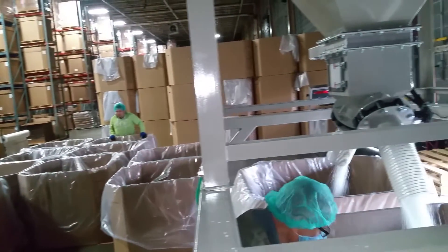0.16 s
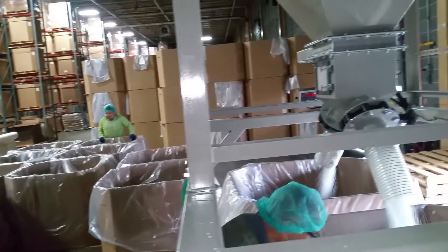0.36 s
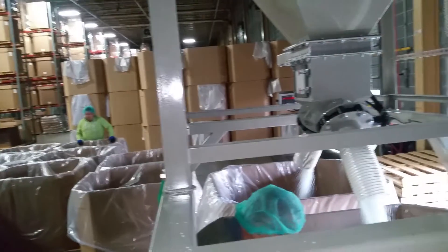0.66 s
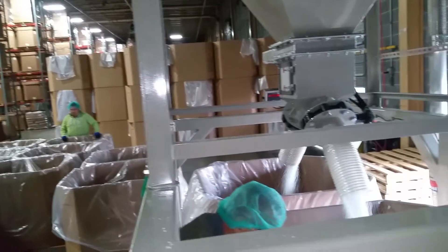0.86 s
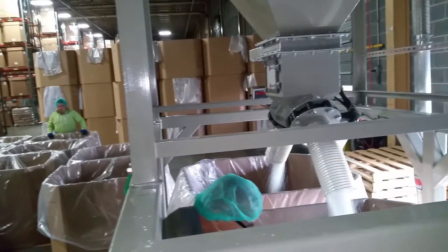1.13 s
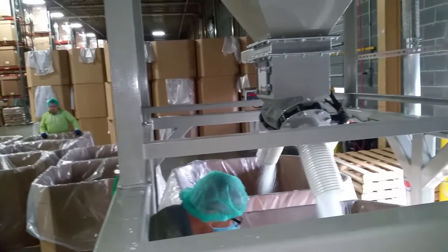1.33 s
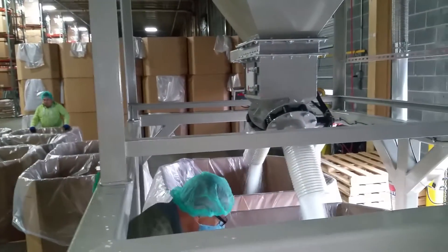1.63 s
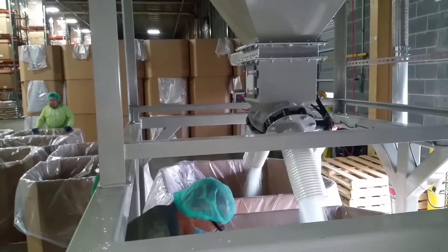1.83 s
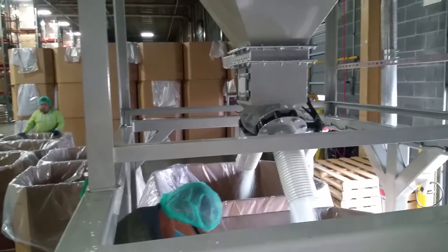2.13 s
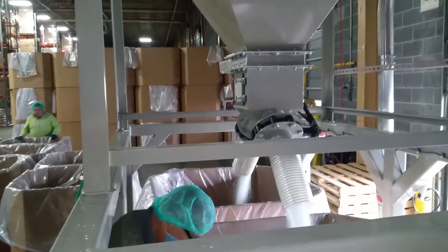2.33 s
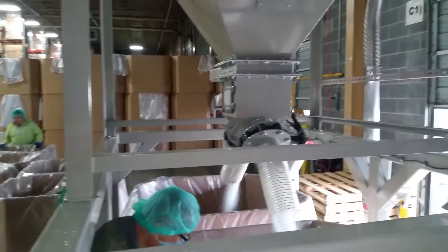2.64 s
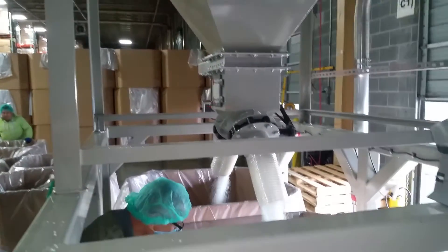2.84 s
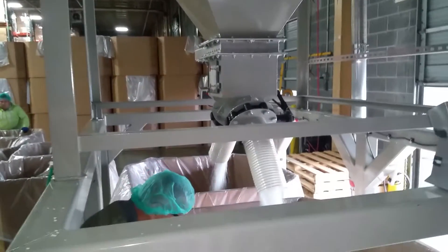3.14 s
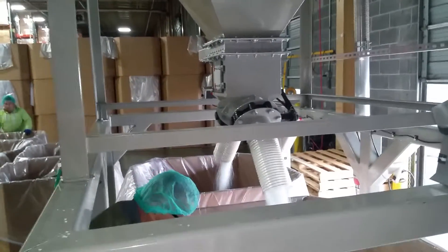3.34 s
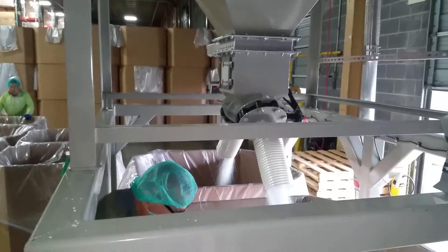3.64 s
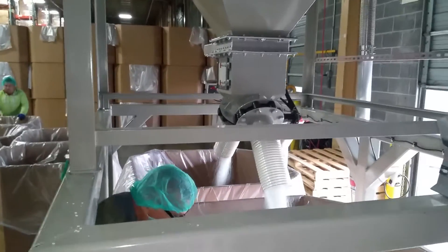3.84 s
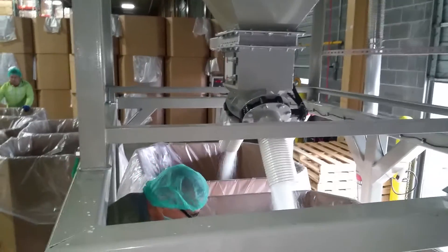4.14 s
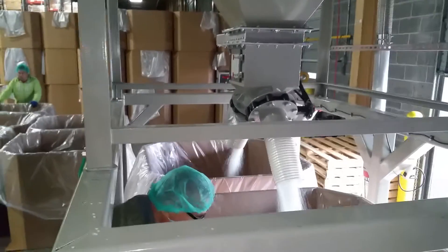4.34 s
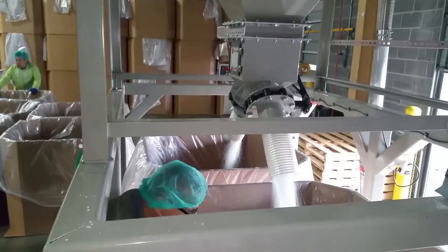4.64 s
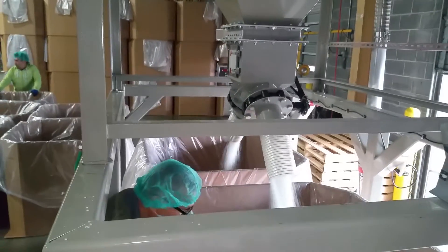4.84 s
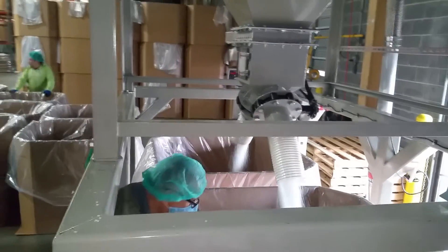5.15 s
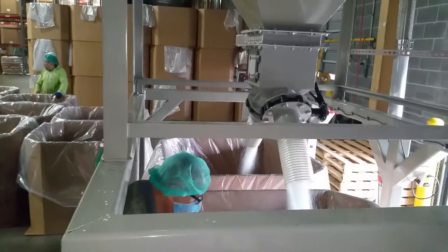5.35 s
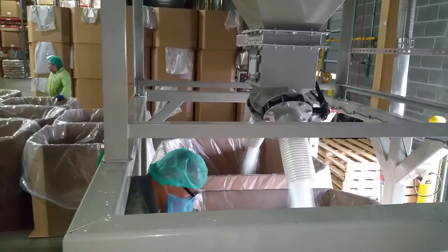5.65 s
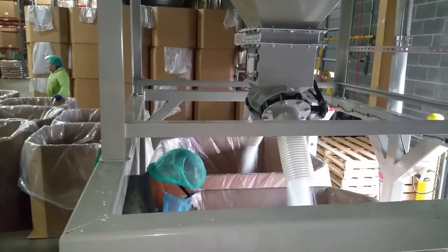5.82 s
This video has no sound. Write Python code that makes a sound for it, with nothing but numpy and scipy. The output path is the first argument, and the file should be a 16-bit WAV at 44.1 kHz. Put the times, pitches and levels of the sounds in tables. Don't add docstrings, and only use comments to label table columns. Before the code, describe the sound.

A steady industrial din already running at the start and never stopping: countless pellets striking the pipe wall, rushing air, a very high nozzle whistle, low blower hum and hopper resonance. Small surges ripple through it. The handheld stereo microphone turns slowly; the right side changes colour around one and a half seconds, and the left loses its midrange ring near 2.7 seconds, while the bright wash continues.

```python
import sys
import numpy as np
from scipy import signal
from scipy.fft import rfft, irfft, next_fast_len
from scipy.io import wavfile
from scipy.ndimage import uniform_filter1d, map_coordinates

SR = 44100
rng = np.random.default_rng(int(sys.argv[2]) if len(sys.argv) > 2 else 0)


def nominal_scale(level):
    x = np.asarray(level, float) / 20
    return 10 ** x


def file_out(sig):
    cols = np.atleast_2d(sig).T
    lim = np.clip(cols, -1, 1)
    pcm = np.round(lim * 32767).astype(np.int16)
    wavfile.write(sys.argv[1], SR, pcm)


N = 263718
TIME_S = np.arange(N) / SR
WHITE_DB = 10 * np.log10(2 / SR)
FRAME = 512


def along(points, hz):
    point_hz, value = np.transpose(points)
    return np.interp(np.log(hz + 1), np.log(point_hz + 1), value)


def over_time(points):
    s, value = np.transpose(points)
    return np.interp(TIME_S, s, value)


def wobble(rate_hz):
    knots = rng.standard_normal(int(N * rate_hz / SR) + 4)
    return map_coordinates(knots, [np.arange(N) * rate_hz / SR])


def filtered(x, response):
    size = next_fast_len(N + 8192)
    hz = np.fft.rfftfreq(size, 1 / SR)
    return irfft(rfft(x, size) * response(hz), size)[..., :N]


def pair(two, alike, lag):
    def blend(hz):
        angle = np.arccos(np.clip(alike(hz) + 0 * hz, 0, 1)) / 2
        return np.array([np.cos(angle), np.sin(angle)])

    def delay(hz):
        half_turn = np.pi * lag(hz) * hz / SR
        return np.exp(-1j * half_turn * np.array([[1], [-1]]))

    mid, side = filtered(two, blend)
    return filtered(np.array([mid + side, mid - side]), delay)


def hail(per_second, scatter_db):
    hit = rng.random((2, N)) < per_second / SR
    strength = nominal_scale(scatter_db * rng.standard_normal((2, N)))
    blows = hit * rng.standard_normal((2, N)) * strength
    return blows / blows.std()


def resonance(mode_hz, width_hz, cut_on_db):
    def response(hz):
        octaves = np.log2(hz / mode_hz + 1e-6)
        flanks = nominal_scale(np.where(octaves < 0, cut_on_db, -4) * octaves)
        damping = 1j * hz * width_hz
        return damping / (mode_hz * mode_hz - hz * hz + damping) * flanks
    return response


def ringing(modes, per_second, drift_db, flutter_db, lag, swell=lambda hz: 0, cut_on_db=4):
    out = np.zeros((2, N))
    for mode_hz, width_hz, left_db, right_db, alike in modes:
        blows = pair(hail(per_second, scatter_db=-3.5), lambda hz: alike, lambda hz: lag)
        drift = drift_db * np.array([wobble(2.46), wobble(2.47)])
        swell_db = swell(mode_hz) + drift + flutter_db * wobble(12)
        gain = nominal_scale(swell_db + [[left_db], [right_db]] - WHITE_DB)
        out += filtered(blows * gain, resonance(mode_hz, width_hz, cut_on_db))
    return out


# time_s, flow_db
FLOW_SURGES = [(0, 0.2), (.4, 0.72), (1.2, 0.5), (1.9, -0.44), (2.8, 0), (3.4, 0.63), (4.1, -0.05),
               (4.6, 0.8), (5, 0.76), (5.35, -0.95), (5.7, .6), (5.98, 0)]


def feed():
    return over_time(FLOW_SURGES)


# mean_db, drift_db_per_s, flow_share
STANDING_WAVES = [
    (-0.5, -0.16, 0.43),
    (0.74, 0.8, 0.2),
    (1.28, 0, 0.45),
]
# centre_s, half_length_s
CREST_TIMES = [
    (2.15, .5),
    (3.05, .25),
]
CREST_HEIGHTS = [2.2, 1.5]


def standing(flow_db):
    crests = [0]
    for (centre_s, half_s), crest_db in zip(CREST_TIMES, CREST_HEIGHTS):
        crests.append(crest_db * np.exp(-((TIME_S - centre_s) / half_s) ** 2))
    swells = []
    for (mean_db, drift_db, share), crest in zip(STANDING_WAVES, crests):
        swells.append(mean_db + drift_db * (TIME_S - TIME_S.mean()) + share * flow_db + crest)
    return swells


PIPE_PITCHES = [1421, 2400, 2686, 2770, 4270, 4325, 4560, 4680, 6040, 6160, 6400, 7960, 9900, 10650, 10750,
                11950]
# width_hz, left_db_per_hz, right_db_per_hz, likeness (0-1)
PIPE_MODES = [(34, -54.5, -56, 0.2), (60, -60.5, -55.5, 0), (59, -49, -49.5, 0.44), (200, -75, -56.5, 0.5),
              (73.4, -49.5, -45, 0.62), (114, -55.5, -49, 0), (25, -53, -49.5, 0.25), (70, -61.5, -65, 0.1),
              (107, -54.5, -42, 0.25), (186, -70, -46.5, 0.42), (394, -70, -55, 0.4),
              (230, -59.5, -59.5, 0.05), (450, -64.5, -65.5, 0), (60, -67, -57, 0), (60, -65, -60, 0),
              (470, -70.5, -62, 0.1)]


def pipe(flow_db):
    low_db, middle_db, high_db = standing(flow_db)

    def swell(hz):
        if hz < 3500:
            return low_db
        return middle_db if hz < 5500 else high_db

    modes = [(hz, *row) for hz, row in zip(PIPE_PITCHES, PIPE_MODES)]
    return ringing(modes, 6000, drift_db=0.5, flutter_db=0.47, lag=10.95, swell=swell, cut_on_db=92)


# pitch_hz, width_hz, left_db_per_hz, right_db_per_hz, likeness (0-1)
WHINE_MODES = [
    (15381, 50, -54, -50, .25),
    (15330, 240, -62, -58, .15),
]


def nozzle():
    return ringing(WHINE_MODES, 9000, drift_db=1.3, flutter_db=2.2, lag=10.5)


def patchy(x, patchy_db):
    spectrum = signal.stft(x, nperseg=FRAME)[2]
    field = rng.standard_normal(spectrum.shape[1:])
    field = uniform_filter1d(field, size=12, axis=0)
    field = uniform_filter1d(field, size=10, axis=1)
    gain = nominal_scale(patchy_db * field / field.std())
    return signal.istft(spectrum * gain, nperseg=FRAME)[1][:, :N]


# frequency_hz, level_db_per_hz
HISS_LEFT = [(25, -89), (55, -82), (300, -75.5), (520, -71), (1000, -65), (2000, -61.5), (3900, -66),
             (4900, -69), (5800, -62), (6900, -72), (9000, -70.5), (12000, -67), (14500, -66), (15700, -69)]
# frequency_hz, level_db_per_hz
HISS_RIGHT = [(25, -89), (55, -83), (300, -76.5), (520, -70), (1000, -63.5), (1600, -65), (3900, -59.5),
              (4900, -54), (5700, -58), (7400, -64), (8900, -65.5), (10500, -63), (14500, -61.5),
              (15700, -58.5)]
# frequency_hz, likeness (0-1)
HISS_LIKENESS = [(30, .995), (70, .95), (200, .8), (600, .76), (1000, .47), (1700, .25), (2200, .12),
                 (16000, .12)]
# frequency_hz, lag_samples
HISS_LAG = [(100, 5), (600, 8.8), (1000, 6.4), (1700, 15.2), (16000, 10.56)]


def air():
    noise = patchy(rng.standard_normal((2, N)), patchy_db=0.89)
    hiss = pair(noise, lambda hz: along(HISS_LIKENESS, hz), lambda hz: along(HISS_LAG, hz))

    def colour(hz):
        return nominal_scale(np.array([along(HISS_LEFT, hz), along(HISS_RIGHT, hz)]) - WHITE_DB)

    return filtered(hiss, colour)


# pitch_hz, width_hz, left_db_per_hz, right_db_per_hz, likeness (0-1)
HALL_BOOMS = [(56, 12, -80, -76, .98), (70.4, 12, -75.5, -77, 1), (114, 18, -78, -79, 0.96),
              (233.5, 28, -76.5, -76, 0.75), (519, 23.5, -65.5, -67.5, 0.67), (1060, 14, -75, -65, 0.4)]


def hall():
    return ringing(HALL_BOOMS, 9000, drift_db=1.0, flutter_db=-3.4, lag=2)


SHAFT_ORDERS = [2, 4, 5, 6, 8, 10, 12, 14]
ORDER_LEVELS = [-74, -60.5, -57.5, -60, -55, -59, -55.5, -55]
# time_s, swell_db
FOURTH_SWELL = [
    (0, -4),
    (2.5, -1),
    (4.3, -1),
    (4.8, 6),
    (5.98, 5),
]


def blower():
    shaft_hz = 73.9 * (1 + 0.00101 * wobble(3.26))
    turns = np.cumsum(shaft_hz) / SR
    fourth_db = over_time(FOURTH_SWELL)
    hum = np.zeros((2, N))
    for order, level_db in zip(SHAFT_ORDERS, ORDER_LEVELS):
        waver_db = 1.7 * wobble(2.47) + 1.5 * np.array([wobble(3.15), wobble(3.0)])
        if order == 4:
            waver_db = waver_db + fourth_db
        phase = order * turns + rng.random() + 0.06 * np.array([wobble(4.17), wobble(4.3)])
        hum += nominal_scale(level_db + 3 + waver_db) * np.sin(2 * np.pi * phase)
    return hum


def turning():
    def fall(at_s, takes_s):
        return (1 - np.tanh((TIME_S - at_s) / takes_s / 2)) / 2

    left = fall(at_s=2.7, takes_s=0.04)
    right = 0.14 + (0.36 - 0.14) * fall(at_s=1.55, takes_s=0.22)
    edge = np.exp(-((TIME_S - 2.72) / 0.16) ** 4)
    glint_db = 2 * left + 3 * edge
    return left, right, glint_db


# frequency_hz, gain_db
EXPOSED_LEFT = [(300, -0.4), (800, 2), (1400, 4), (2000, 6.5), (2700, 9.5), (3400, 6.5), (4300, 9),
                (5500, 5), (6800, -1), (12000, -3.5)]
# frequency_hz, gain_db
EXPOSED_RIGHT = [(300, -0.5), (1000, -1), (1800, 14.5), (2600, -5.5), (4300, -11), (6000, 1), (8000, 2.5),
                 (12000, -5.5)]
# frequency_hz, share
GLINT_SHARE = [(5000, 0.085), (7500, 1.2), (16000, 1.5)]


def shadowed(x):
    left, right, glint_db = turning()
    hz, frame_s, spectrum = signal.stft(x, SR, nperseg=FRAME)
    at = np.minimum((frame_s * SR).astype(int), N - 1)
    left_db = np.outer(along(EXPOSED_LEFT, hz), left[at]) + np.outer(along(GLINT_SHARE, hz), glint_db[at])
    right_db = np.outer(along(EXPOSED_RIGHT, hz), right[at])
    return signal.istft(spectrum * nominal_scale([left_db, right_db]), SR, nperseg=FRAME)[1][:, :N]


def scene():
    flow_db = feed()
    conveying = pipe(flow_db) + nozzle() + air()
    conveying = conveying * nominal_scale(flow_db + 0.32 * wobble(7))
    return shadowed(conveying + hall() + blower())


def band_limit(x):
    return signal.sosfilt(signal.butter(12, 15740, fs=SR, output="sos"), x)


def record(dry):
    rounded = dry / (1 + np.abs(dry / 0.9) ** 8) ** (1 / 8)
    return band_limit(rounded)


dry = scene()
out = record(dry)
file_out(out)
```